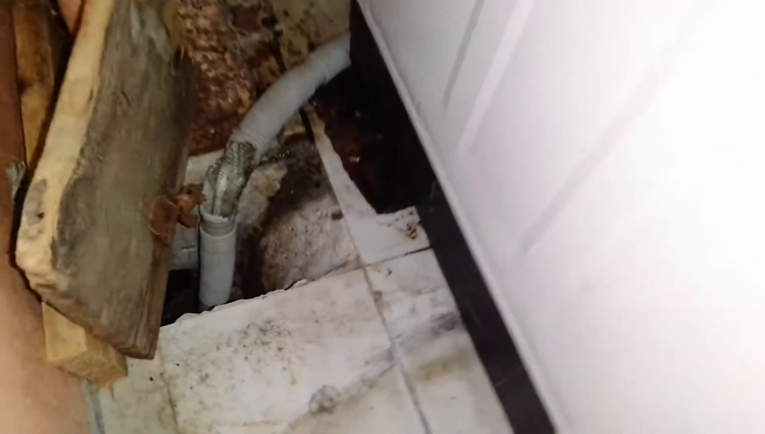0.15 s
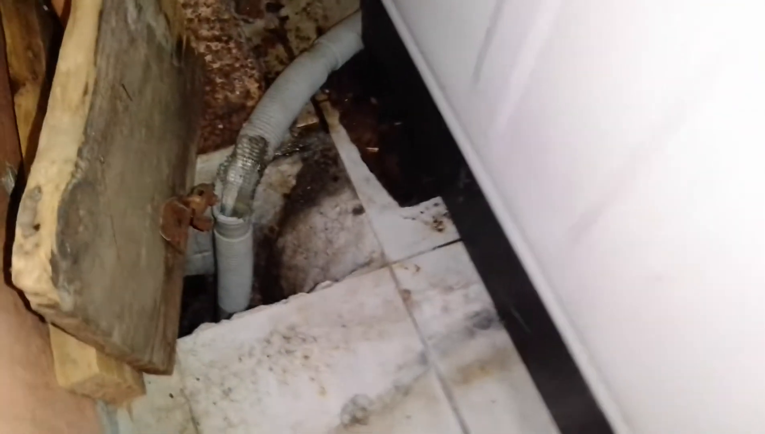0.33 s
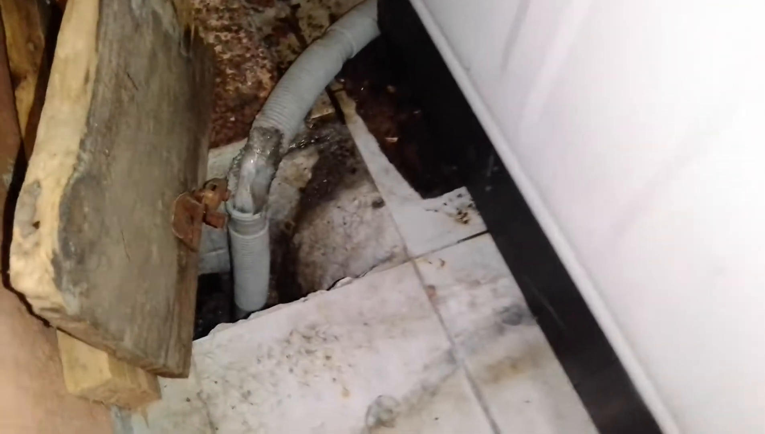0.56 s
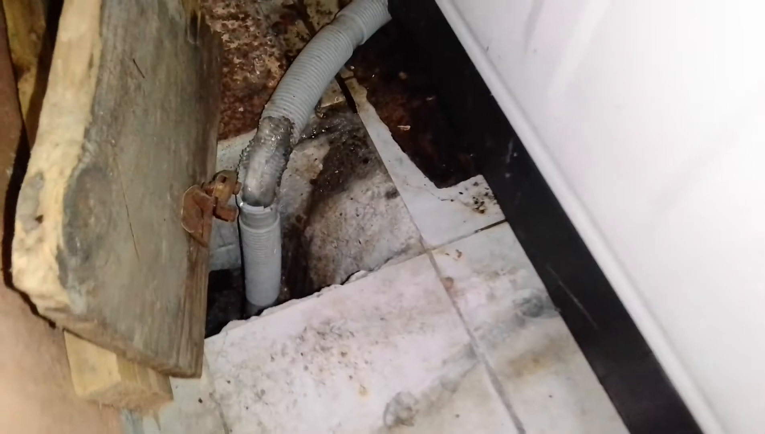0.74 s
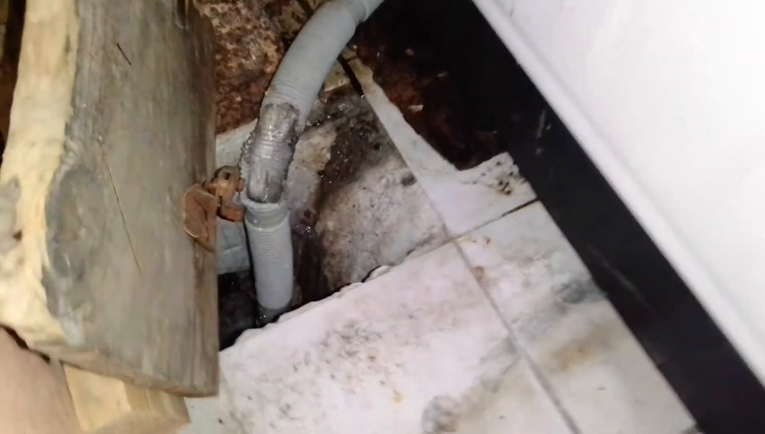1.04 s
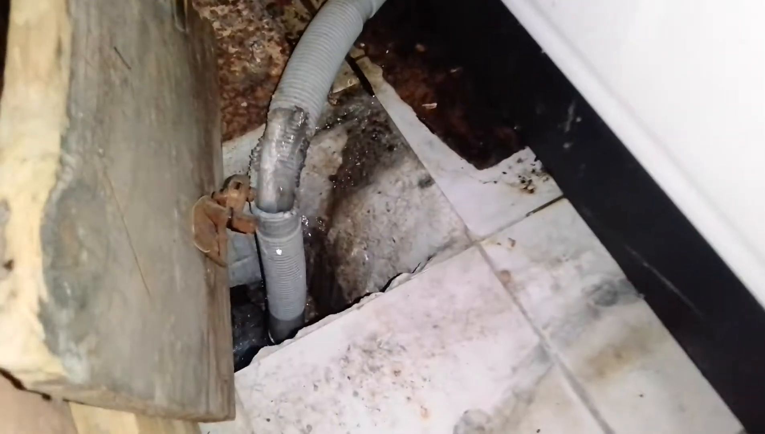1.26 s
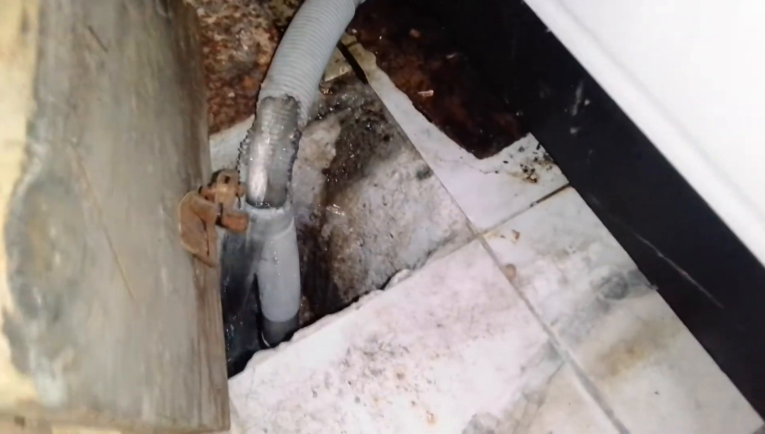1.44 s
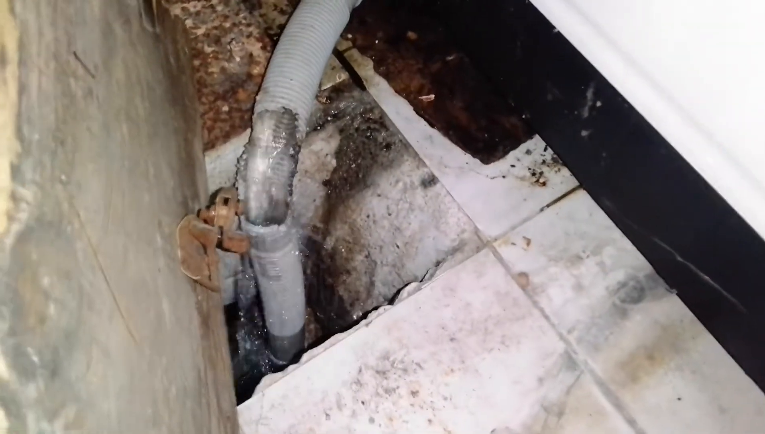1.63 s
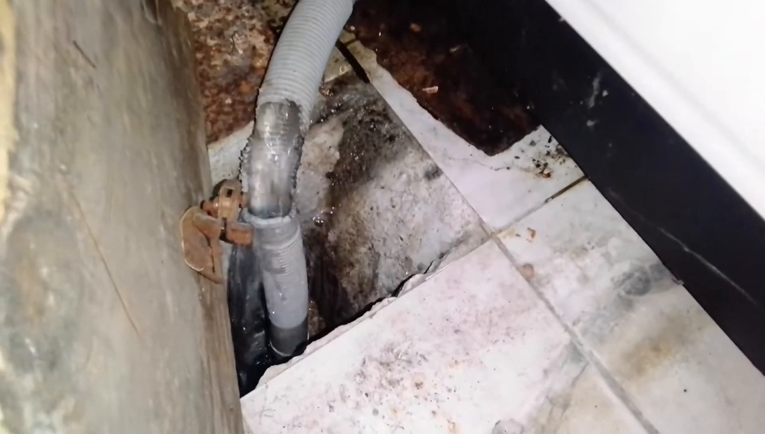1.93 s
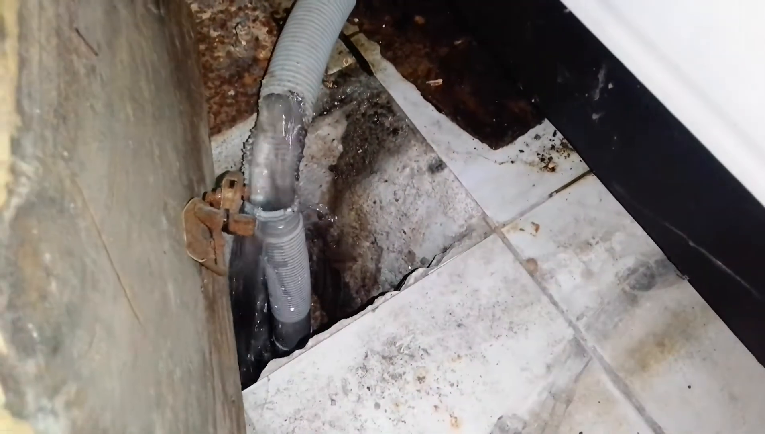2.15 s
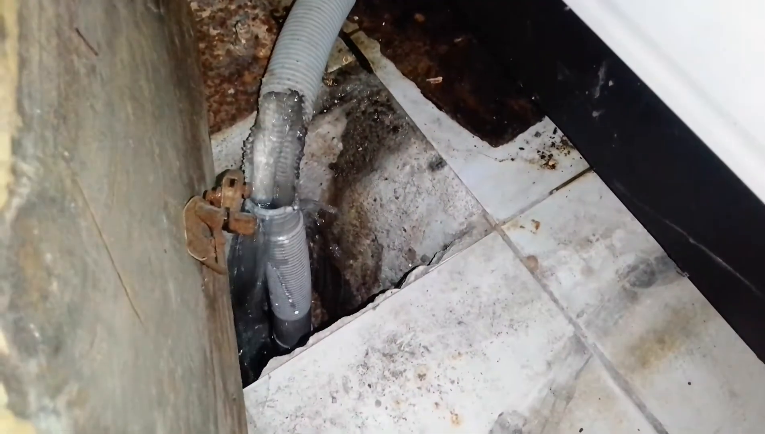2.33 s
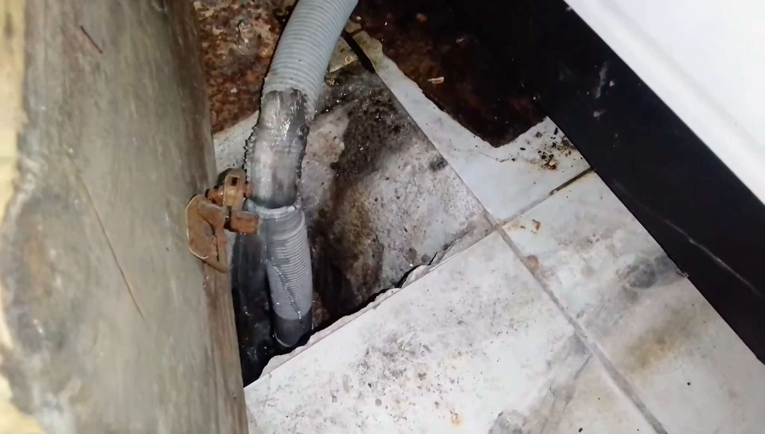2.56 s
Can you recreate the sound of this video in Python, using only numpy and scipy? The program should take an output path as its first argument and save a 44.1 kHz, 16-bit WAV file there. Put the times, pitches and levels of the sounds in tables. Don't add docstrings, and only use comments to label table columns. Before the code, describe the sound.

Water gushes from a drain hose into a floor pipe, splashing and gurgling louder as we near

```python
import sys
import numpy as np
from scipy import signal
from scipy.fft import rfft, irfft
from scipy.io import wavfile
from scipy.ndimage import uniform_filter1d

SR = 44100
rng = np.random.default_rng(int(sys.argv[2]) if len(sys.argv) > 2 else 0)


def gain_from_db(level_db):
    decades = np.asarray(level_db, float) / 20
    return 10 ** decades


def pcm_store(signal):
    levels = np.round(np.clip(np.atleast_2d(signal), -1, 1) * 32767)
    wavfile.write(sys.argv[1], SR, levels.astype(np.int16).T)


N = 118629

# (time [s], station [index])
MIC_PATH = [(0, 0), (.1, .3), (.24, 1), (.62, 1), (.75, 2), (1.04, 2), (1.1, 3), (1.6, 3), (1.68, 3.4),
            (2.0, 3.7), (2.3, 4), (2.69, 4)]
STATION_DB = [
    -46,
    -49,
    -47,
    -41.5,
    -41.5,
]
# (frequency [Hz], level [dB per Hz])
FAR_COLOUR = [(190, -15), (320, -16.5), (1000, -8), (1150, -12.5), (2210, -13), (3200, -15.5), (4400, -24),
              (7000, -53.5)]
MIDWAY_COLOUR = [(190, -14.5), (460, -10), (1230, -7.5), (3120, -3), (4500, -7.5), (4800, -23.5),
                 (5800, -32), (7000, -44)]
NEAR_COLOUR = [(190, -15), (460, -8), (800, -5), (2400, -7), (4300, -2), (5400, -9.5), (5800, -27),
               (7000, -41)]
# (frequency [Hz], width [Hz], boost [dB])
PIPE_MODES = [(275, 81, 10), (351.5, 48, 11.5), (473, 106, 11.5), (574, 69, 4.5), (626, 140, 4),
              (953, 9.8, 3), (1203, 65, -10.5)]
# (frequency [Hz], width [Hz], boost [dB])
PIT_FIRST = [(264, 260, 7), (576, 330, 3), (3760, 330, 11.5), (4260, 250, 7), (4740, 200, 19.5)]
PIT_FAR = [(1180, 510, -5), (1570, 31, 2), (2250, 280, 5), (2790, 170, 10), (3200, 240, 11.5),
           (3286, 330, -13.5), (3857, 200, 14.5)]
PIT_TURNED = [(1570, 170, -1), (1827, 51, 6), (2200, 210, 4), (2570, 130, 8.5), (3123, 130, 12),
              (3330, 220, -5), (3844, 33, 7)]
PIT_MIDWAY = [(1860, 130, -7.5), (2040, 81, 2), (2290, 130, -5.5), (3120, 840, -10.5), (3962, 50, 8),
              (4275, 360, 0), (5300, 62, -13)]
PIT_NEAR = [(1650, 210, 3.4), (1920, 15, 1.3), (2498, 220, 10.4), (2690, 50, 4.8), (3690, 220, 6.1),
            (4230, 98, 1.5), (4250, 26, 2.8), (5240, 310, 2.2)]
# (delay [s], level [dB])
WALL_ECHOES = [(.0045, -18), (.009, -42.5), (.016, -16.5), (.024, -13)]
# (time [s], level [dB])
FLOW = [(0, 10), (.04, 4.5), (.12, 2.5), (.3, 2), (.5, 3), (.7, 1), (.9, 1.5), (1.05, 5), (1.15, -2),
        (1.3, -0.5), (1.5, -0.5), (1.62, 1.5), (1.78, 4), (1.9, 0), (2.08, 4.5), (2.25, 3), (2.45, 2),
        (2.69, 5.5)]
# (time [s], depth [dB], length [s])
LULLS = [(0.424, -2, 0.09), (1.133, -2.5, 0.016), (1.284, -7.5, 0.026), (1.33, -1, 0.0093),
         (1.647, -11, 0.0095), (1.697, -8.5, 0.021), (1.816, -8, 0.0098), (1.95, -1, 0.019),
         (2.009, -2.5, .015), (2.088, -8, 0.028), (2.291, -7.5, 0.016), (2.34, -2, 0.061),
         (2.424, -2, 0.011), (2.612, -4, 0.017), (2.654, -8.5, 0.016)]
# (time [s], level on the scale of FLOW [dB], t60 [s])
SLAPS = [(.442, 7.5, 0.22), (.762, 18, 0.037), (1.350, 16, 0.073), (1.639, 6, 0.039), (1.660, 8.5, 0.09),
         (1.681, 8.5, 0.14), (1.706, -5, .1), (1.733, 7, 0.14), (1.757, 10, 0.19), (2.437, 17, 0.05),
         (1.818, -3, 0.031), (2.195, 18, 0.035), (2.529, 13.5, 0.045), (2.592, -5, 0.024),
         (2.662, 19.5, 0.025), (1.29, 7, 0.043), (1.966, 14, 0.035), (2.02, 9, 0.091), (2.042, 0, 0.041),
         (2.297, 12.5, 0.042), (2.388, 9, 0.1), (2.474, 12, 0.2), (2.54, 10, 0.11), (2.625, 10, 0.037)]
# (time [s], peak level [dB], pitch [Hz])
PLINKS = [(0.1241, -32, 2430), (0.2245, -32, 2570), (0.2767, -60, 2230), (0.3098, -30, 3080),
          (0.3515, -34.5, 2460), (0.3835, -34.5, 1570), (0.443, -30, 1534), (0.4698, -38.5, 2200),
          (0.5214, -23.5, 2200), (0.593, -25.5, 2220), (0.6325, -32, 3840), (0.685, -31, 2570),
          (0.7188, -32.5, 2200), (0.762, -41, 3120), (0.808, -32, 2750), (0.833, -25, 2000),
          (0.9544, -28.5, 2317), (0.9958, -29.5, 2230), (1.0904, -31, 4100), (1.1902, -31, 4230),
          (1.2193, -33, 4000), (1.2302, -28, 4250), (1.289, -28, 4250), (1.3091, -43, 3530),
          (1.3527, -19, 3870), (1.4362, -26.5, 1663), (1.5422, -25, 1557), (1.5652, -22, 4010),
          (1.64, -20, 3750), (1.6606, -18, 3480), (1.709, -24, 3230), (1.7375, -24, 2640),
          (1.7667, -15, 3590), (1.8183, -24, 3800), (1.8666, -24.5, 2650), (1.9659, -35, 3840),
          (2.0657, -20.5, 2606), (2.1083, -21, 3760), (2.1963, -19, 2640), (2.2638, -23, 2607),
          (2.2964, -42, 2470), (2.4367, -28, 2660), (2.4743, -26, 3630), (2.5296, -16, 4020),
          (2.59, -21, 3470), (2.6633, -17, 4240)]
# (time [s], peak level [dB], pitch [Hz])
GLUGS = [(0.056, -36, 500), (0.085, -34, 500), (0.158, -47, 620), (0.206, -44, 480), (0.384, -46, 490),
         (0.444, -40.5, 1000), (0.519, -34, 796), (0.576, -39.5, 1050), (0.651, -37.5, 459),
         (0.695, -37, 465), (0.786, -40.5, 343), (0.856, -37, 353), (0.899, -37.5, 474), (0.975, -33, 595),
         (1.001, -35, 640), (1.022, -29.5, 473), (1.114, -31.5, 400), (1.183, -34.5, 480),
         (1.204, -38.5, 455), (1.253, -37, 457), (1.352, -29, 458), (1.428, -25, 542), (1.483, -37.5, 600),
         (1.732, -33, 364), (1.816, -39, 580), (1.86, -32.5, 480), (1.909, -32, 474), (1.934, -34, 590),
         (2.095, -34, 453), (2.193, -35, 473), (2.255, -34, 540), (2.292, -30, 464), (2.362, -34, 1040),
         (2.433, -33, 456), (2.475, -34, 454), (2.622, -29.5, 986)]
# (time [s], peak level [dB])
SPITS = [(0.3252, -54), (0.7622, -53), (0.9777, -52.5), (1.21, -53), (1.3069, -54), (1.4805, -49),
         (1.7195, -59), (1.7365, -62), (1.9714, -93), (2.028, -42), (2.0996, -50), (2.391, -46),
         (2.4369, -49), (2.479, -49), (2.516, -45), (2.59, -43.5)]
# (frequency [Hz], level [dB per Hz])
FIZZ_COLOUR = [(5000, -3.5), (6090, -9), (8650, -16.5), (10300, -17.5), (12500, -12.5), (15100, -10),
               (15900, -7.5)]
# (frequency [Hz], level [dB per Hz])
HUM_COLOUR = [(25, 9), (48, -7), (75, 0.5), (115, 8), (150, 0)]


def evened(x):
    return x / np.sqrt(np.mean(x ** 2) + 1e-20)


def add(mix, s, sound):
    part = mix[round(s * SR):][:len(sound)]
    part += sound[:len(part)]


def rush(patchy_db=4.2, drift_db=1.4, flicker_db=2.4, swell_db=1.0):
    frames, bins = N // 64 + 5, 129
    real, imag, patches, drift = rng.standard_normal((frames, bins, 4)).T
    patches = uniform_filter1d(patches, size=3, axis=0)
    patches = evened(uniform_filter1d(patches, size=16, axis=1))
    drift = uniform_filter1d(drift, size=2, axis=0)
    drift = evened(uniform_filter1d(drift, size=90, axis=1))
    lively = np.clip(np.arange(bins) / 12, .4, 1)[:, None]
    flicker, swell = rng.standard_normal((frames, 2)).T
    flicker = evened(uniform_filter1d(flicker, size=10))
    swell = evened(uniform_filter1d(swell, size=40))
    surge_db = flicker_db * flicker + swell_db * swell
    level_db = lively * (patchy_db * patches + surge_db) + drift_db * drift
    spectrum = (real + 1j * imag) * gain_from_db(level_db)
    return evened(signal.istft(spectrum, nperseg=256, noverlap=192)[1][:N])


def bubble(hz, cycles, rise):
    u = np.arange(0, 4 * cycles / hz, 1 / SR) * hz / cycles
    shape = (1 - np.exp(-u / .12)) * np.exp(-.3 * u - .7 * u ** 2)
    return shape / shape.max() * np.sin(2 * np.pi * cycles * (u + rise * u ** 2 / 2))


def walls(x):
    return x + sum(gain_from_db(db) * np.r_[np.zeros(round(s * SR)), x][:N] for s, db in WALL_ECHOES)


def small_bubbles(per_s=3200, spread_db=3.3, sizes=48):
    draw, loudness, kind = rng.random((N, 3)).T
    clumps = gain_from_db(3.0 * evened(uniform_filter1d(rng.standard_normal(N), size=900)))
    born = draw < clumps * per_s / SR
    hits = born * gain_from_db(spread_db * np.minimum(-np.log(loudness + 1e-9), 5))
    pitch = np.geomspace(250, 6500, sizes)
    kind = np.searchsorted(np.cumsum(pitch) / pitch.sum(), kind)
    out = np.zeros(N)
    for k, hz in enumerate(pitch):
        grain = bubble(hz, (5.0, 11.0, 18.0)[k % 3], 0.028)
        grain = min(hz / 1500, 1) * grain / np.linalg.norm(grain)
        out += signal.oaconvolve(hits * (kind == k), grain)[:N]
    return evened(walls(out))


def bursts(rows):
    out, t = np.zeros(N), np.arange(SR // 4) / SR
    for s, db, t60 in rows:
        add(out, s, np.minimum(t / .002, 1) * gain_from_db(db - 60 * t / max(t60, .01)))
    return out


def slaps():
    high_pass = signal.butter(1, 1400, "high", fs=SR)
    return bursts(SLAPS) * signal.lfilter(*high_pass, rng.standard_normal(N))


def jet():
    t = np.arange(N) / SR
    flow_db = np.interp(t, *np.transpose(FLOW))
    for s, depth_db, length in LULLS:
        flow_db = flow_db + depth_db * np.exp(-(2 * (t - s) / length) ** 2)
    water = gain_from_db(-5) * rush() + gain_from_db(-2.5) * small_bubbles()
    return gain_from_db(flow_db) * water + slaps()


def hollow(x, ring_db=-7, t60=.1):
    t = np.arange(SR // 5) / SR
    tail = rng.standard_normal(len(t)) * np.minimum(t / .004, 1) * gain_from_db(-60 * t / t60)
    ring = signal.oaconvolve(x, tail / np.linalg.norm(tail))[:N]
    return (x + gain_from_db(ring_db) * ring) / np.hypot(1, gain_from_db(ring_db))


def colour(x, spectrum, peaks=(), skirt_db=-30):
    size = 8192
    hz = np.fft.rfftfreq(size, 1 / SR) + 1
    f, value = np.transpose(spectrum)
    octaves_outside = np.maximum(np.log2(f[0] / hz), 0) + np.maximum(np.log2(hz / f[-1]), 0)
    db = np.interp(np.log(hz), np.log(f), value) + skirt_db * octaves_outside
    for top, width, boost_db in peaks:
        db = db + boost_db / (1 + (2 * (hz - top) / width) ** 2)
    fold = np.r_[1, 2 * np.ones(size // 2 - 1), 1, np.zeros(size // 2 - 1)]
    cepstrum = irfft(np.log(gain_from_db(np.maximum(db, -100)))) * fold
    taps = irfft(np.exp(rfft(cepstrum)))[:size // 2]
    return signal.oaconvolve(x, taps / np.linalg.norm(taps))[:N]


def stream(drive, station):
    tones = (FAR_COLOUR, FAR_COLOUR, FAR_COLOUR, MIDWAY_COLOUR, NEAR_COLOUR)
    pits = (PIT_FIRST, PIT_FAR, PIT_TURNED, PIT_MIDWAY, PIT_NEAR)
    out = np.zeros(N)
    for k, (tone, pit, db) in enumerate(zip(tones, pits, STATION_DB)):
        nearness = np.clip(1 - abs(station - k), 0, 1)
        out += gain_from_db(db) * colour(hollow(drive * nearness), tone, PIPE_MODES + pit)
    return out


def spatter(hz, octaves, t60):
    t = np.arange(SR // 8) / SR
    edges = hz * 2. ** np.array([-octaves, octaves])
    band_pass = signal.butter(2, edges, "band", fs=SR, output="sos")
    band = signal.sosfilt(band_pass, rng.standard_normal(len(t)))
    return evened(band) * np.minimum(t * hz / 3, 1) * gain_from_db(-60 * t / max(t60, .01))


def big_bubbles():
    out = np.zeros(N)
    for s, db, hz in PLINKS:
        add(out, s - .001, gain_from_db(db - 9.5) * bubble(hz, 16.1, 0.035))
        add(out, s - .001, gain_from_db(db - 12) * spatter(hz, 0.17, t60=0.047))
    for s, db, hz in GLUGS:
        add(out, s - .002, gain_from_db(db - 10.5) * bubble(hz, 6.26, 0.022))
        add(out, s - .002, gain_from_db(db - 8) * spatter(hz, 0.2, t60=0.17))
    return walls(out)


def spray(drive, station):
    surge = (abs(uniform_filter1d(drive ** 2, size=300)) + 1e-9) ** 0.17
    level = gain_from_db(-63.5 + 3 * np.maximum(station - 2, 0))
    fizz = level * surge * rush(patchy_db=2.4, drift_db=.5, flicker_db=1.0, swell_db=.8)
    landed = rng.random(N) < 1200 / SR
    ticks = gain_from_db(6.7 * np.minimum(rng.exponential(1, N), 5)) * landed * rng.choice([-1, 1], N)
    fizz = fizz + level * gain_from_db(-18) * evened(walls(ticks))
    spits = bursts([(s, db, .06) for s, db in SPITS]) * rng.standard_normal(N)
    return colour(fizz + spits, FIZZ_COLOUR, skirt_db=-44)


def room_hum(station):
    t = np.arange(N) / SR
    bump_db, bump_t60 = 25.5, 0.075
    hum = colour(rng.standard_normal(N), HUM_COLOUR, skirt_db=-2)
    hum = (1 + gain_from_db(bump_db - 60 * t / bump_t60)) * hum
    return gain_from_db(-76 + 1.1 * (station - 0.5)) * hum


def scene():
    station = np.interp(np.arange(N) / SR, *np.transpose(MIC_PATH))
    drive = jet()
    low_cut = signal.butter(6, 190, "high", fs=SR, output="sos")
    water = signal.sosfilt(low_cut, stream(drive, station) + big_bubbles())
    return (water + spray(drive, station) + room_hum(station))[None]


def top_cut(x):
    return signal.sosfilt(signal.butter(12, 15860, fs=SR, output="sos"), x)


def record(dry):
    low_pass = signal.firwin(511, 15850, window=("kaiser", 9), fs=SR)
    limited = signal.oaconvolve(dry, low_pass[None], "same")
    return top_cut(limited)


dry = scene()
out = record(dry)
pcm_store(out)
```